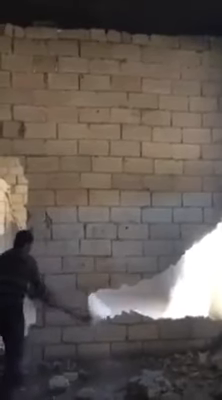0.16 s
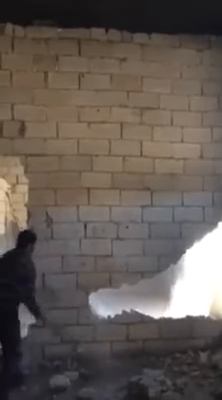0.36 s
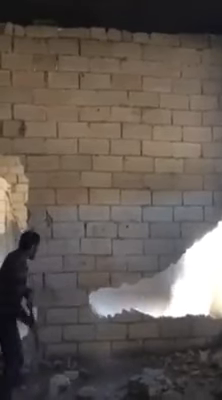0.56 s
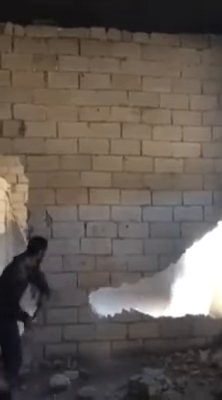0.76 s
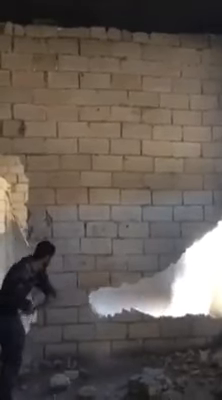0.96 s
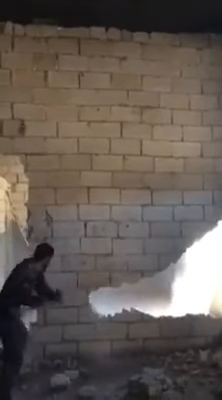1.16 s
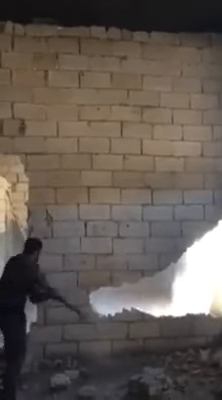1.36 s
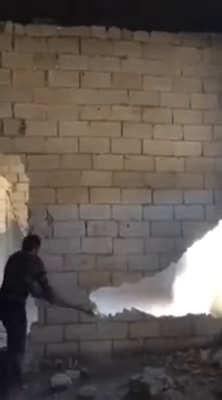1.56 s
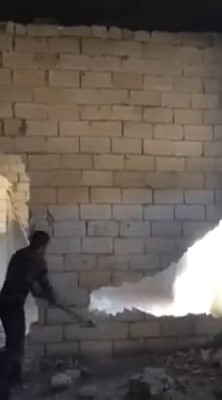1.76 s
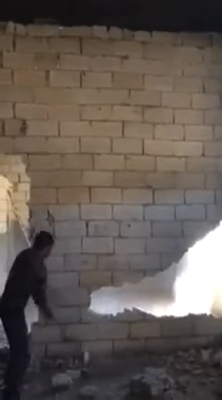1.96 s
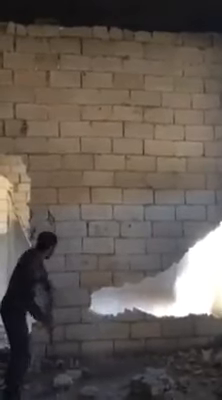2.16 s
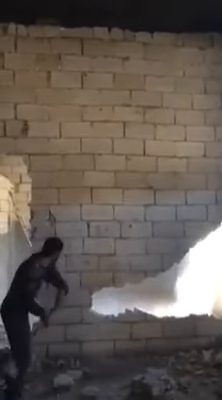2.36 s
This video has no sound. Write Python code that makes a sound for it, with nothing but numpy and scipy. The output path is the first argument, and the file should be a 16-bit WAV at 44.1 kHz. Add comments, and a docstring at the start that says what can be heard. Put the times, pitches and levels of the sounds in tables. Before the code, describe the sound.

A sledgehammer hits a concrete-block wall at 0.24 s with a deep, heavy thud and short block knock, its boom and dull echoes decaying for over a second in a large bare shed. Grit patters near 0.6 s and rubble scuffs lightly until 1.6 s. At 1.78 s a second blow lands, less bassy, with a brighter steel clack, and grit falls again around 2.1 and 2.4 s. Faint low background throughout.

```python
"""Sledgehammer on a block wall

A sledgehammer strikes a concrete-block wall twice inside a large bare shed, over a faint background noise.
Each blow is a low thud of the wall, a knock of the block and a ring of the steel head, all from struck modes,
plus a noisy crack. The shed, a decaying noise response, rings on for well over a second; dull echoes follow.
Loosened grit, made of random grains, drops a third of a second later; rubble scuffs between the blows."""
import sys
import numpy as np
from scipy import signal
from scipy.io import wavfile

SR = 44100
rng = np.random.default_rng(int(sys.argv[2]) if len(sys.argv) > 2 else 0)


def generate_wav(sig):
    """Save sig (samples, or channels by samples) to the path in sys.argv[1] as 16-bit PCM at SR."""
    pcm = np.round(np.clip(np.atleast_2d(sig).T, -1, 1) * 32767).astype(np.int16)
    wavfile.write(sys.argv[1], SR, pcm)


N = 105840  # samples

# The hammer blows. Each row: time in seconds, thud level in dB, thud pitch in Hz, knock level in dB,
# crack level in dB, steel ring level in dB, then the bass, middle and treble sent into the shed, in dB.
BLOWS = [(0.2423, 2.5, 180, -2, -31, -29, 1, -9, -6.5),
         (1.7837, -5, 133, -10.5, -24.5, -4.5, -5, 1.5, -1.5)]
# Resonances of the whole wall. Each row: pitch in Hz, level in dB, t60 in seconds.
WALL_MODES = [(77, -11, 0.051), (123, 3, 0.11), (154.8, -0.5, 0.1)]


def amp(db):
    """Turns dB into an amplitude factor."""
    return 10 ** (np.asarray(db, float) / 20)


def rms_one(x):
    """Scales a signal to an RMS of one."""
    return x / np.sqrt(np.mean(x ** 2) + 1e-20)


def at_hz(points, hz):
    """Reads a curve of (Hz, value) points along a logarithmic frequency axis."""
    points_hz, values = np.array(points).T
    return np.interp(np.log(hz), np.log(points_hz), values)


def clicks(times, levels_db):
    """Single-sample clicks, each shared between its two nearest samples."""
    out = np.zeros(N + 2)
    at = np.asarray(times) * SR
    first, fraction = at.astype(int), at % 1
    np.add.at(out, first, amp(levels_db) * (1 - fraction))
    np.add.at(out, first + 1, amp(levels_db) * fraction)
    return out[:N] + 1e-18  # tiny offset keeps the filters off denormals


def ring(x, modes):
    """Clicks strike a bank of resonators, each a decaying sine (Hz, dB, t60 s)."""
    out = 0
    for hz, db, t60 in modes:
        radius = amp(-60 / (t60 * SR))  # decay per sample
        w = 2 * np.pi * hz / SR
        feedback = [1, -2 * radius * np.cos(w), radius * radius]
        out = out + signal.lfilter([0, amp(db) * np.sin(w)], feedback, x)
    return out


def band(x, low_hz, high_hz):
    """Band-pass filter."""
    sos = signal.butter(2, [low_hz, min(high_hz, .45 * SR)], "band", fs=SR, output="sos")
    return signal.sosfilt(sos, x)


def bands():
    """Third-octave bands of noise, as (centre Hz, noise)."""
    edges = 22 * 2 ** (np.arange(30) / 3)
    white = rng.standard_normal((2, N + SR // 2))  # neighbouring bands take different noise
    out = []
    for k, (low, high) in enumerate(zip(edges, edges[1:])):
        noise = band(white[k % 2], low, high)[-N:]  # drops the filter's start-up
        out.append((np.sqrt(low * high), noise))
    return out


def swell(start, rise, t60):
    """Envelope that rises from start (rise in seconds), then dies away by 60 dB per t60."""
    t = np.maximum(np.arange(N) / SR - start, 0)
    return (1 - np.exp(-t / max(rise, 1e-4))) * amp(-60 * t / t60)


def grit():
    """Falling grit and scuffed rubble: dense uneven grains, each patch with its own colour."""
    # Patches. Each row: start in seconds, level in dB, rise in seconds, t60 in seconds,
    # centre in Hz, width in octaves.
    patches = [(-.05, -57.5, 0.013, 0.55, 2000, 3.0), (0.089, -54, 0.017, 0.37, 5500, 0.89),
               (0.1545, -48.5, .001, 0.22, 4440, 1.57), (0.156, -54.5, 0.0093, 0.33, 1330, 3),
               (.54, -53, 0.014, 1.26, 6740, 0.77), (0.597, -43.5, 0.005, 0.28, 5560, 0.9),
               (.78, -49, 0.075, 0.6, 5200, 0.97), (0.961, -46.5, 0.041, 0.41, 2800, 1.84),
               (1.413, -55, 0.0064, 0.45, 1760, 1.22), (1.42, -53.5, 0.01, 0.24, 3770, 0.61),
               (1.43, -62.5, 0.0073, 1.1, 5700, 0.96), (1.575, -59, 0.0083, 4.5, 3800, 2.06),
               (2.125, -50, 0.017, 0.93, 8950, 3.2), (2.364, -39, 0.033, 0.46, 4460, 1.3)]
    grains_per_s, spread_db = 4000, 1.5
    out = 0
    for start, db, rise, t60, hz, octaves in patches:
        present = rng.random(N) < grains_per_s / SR
        size = amp(spread_db * np.minimum(rng.exponential(1, N), 4))
        grains = present * size * rng.choice([-1, 1], N)
        half_width = 2 ** (octaves / 2)
        coloured = rms_one(band(grains, hz / half_width, hz * half_width))
        out = out + amp(db) * swell(start, rise, t60) * coloured
    return out


def air():
    """Steady background: noise bands weighted into one smooth spectrum."""
    # Spectrum of the background. Each row: frequency in Hz, relative density in dB per Hz.
    spectrum = [(25, -24), (70, 3.5), (140, -1), (300, -8.5), (800, -11), (2200, -15.5), (4000, -20),
                (8000, -33), (15000, -35)]
    level_db = -55.5  # RMS of the whole
    coloured = sum(amp(at_hz(spectrum, hz)) * noise for hz, noise in bands())
    return amp(level_db) * rms_one(coloured)


def wall_thud():
    """The wall yields slowly: one low, soft mode per blow, after a faint low lead-in and a push through the ground."""
    lead_s, t60_s, soft_hz = 0.0019, 0.051, 496
    ground_lead_s, ground_db, ground_hz = 0.00542, -9.5, 282  # dB relative to the thud
    lead_in_s, lead_in_db = 0.0158, -36                       # dB relative to the thud
    s, thud_db, thud_hz, *_ = np.transpose(BLOWS)
    lead_in = ring(clicks(s - lead_in_s, thud_db + lead_in_db), WALL_MODES)
    ground = ring(clicks(s - ground_lead_s, thud_db + ground_db), [(ground_hz, 0, .02)])
    thud = lead_in + ground
    for t, db, hz in zip(s, thud_db, thud_hz):
        thud = thud - ring(clicks([t - lead_s], [db]), [(hz, 0, t60_s)])  # opposite push
    return signal.sosfilt(signal.butter(2, soft_hz, fs=SR, output="sos"), thud)


def knock_and_steel():
    """Block face and hammer head ring as struck modes, touched twice as the head rebounds."""
    # Block face modes, the knock. Each row: pitch in Hz, level in dB, t60 in seconds.
    block_modes = [(960, -6.5, 0.016), (1230, 4.5, 0.0073), (1830, 7, 0.0051)]
    # Hammer head modes. Each row: pitch in Hz, level in dB, t60 in seconds.
    steel_modes = [(2160, 2.5, 0.012), (3080, 7.5, 0.0073), (4000, -4, 0.019)]
    rebound_s, rebound_db = 0.0064, -11  # second touch, relative to the first
    s, _, _, knock_db, _, steel_db, *_ = np.transpose(BLOWS)
    touches = np.r_[s, s + rebound_s]
    knock = ring(clicks(touches, np.r_[knock_db, knock_db + rebound_db]), block_modes)
    steel = ring(clicks(touches, np.r_[steel_db, steel_db + rebound_db]), steel_modes)
    return -knock - steel


def crack():
    """Splitting concrete: a sharp burst of bright noise with a little full-range noise under it."""
    rise_s, t60_s, low_hz, high_hz = 0.00065, 0.087, 2500, 7400
    s, _, _, _, crack_db, *_ = np.transpose(BLOWS)
    bright = band(rng.standard_normal(N), low_hz, high_hz)
    noise = rms_one(bright + amp(-11) * rng.standard_normal(N))
    burst = sum(amp(db) * swell(t, rise_s, t60_s) for t, db in zip(s, crack_db))
    return burst * noise


def shed_pulses():
    """What each blow sends into the shed: one three-band pulse, its top stronger for a clean steel contact."""
    middle_from_hz, treble_from_hz = 1040, 5600
    s, *_, bass_db, middle_db, treble_db = np.transpose(BLOWS)
    bass, middle, treble = clicks(s, bass_db), clicks(s, middle_db), clicks(s, treble_db)

    def under(hz, x):
        return signal.lfilter(*signal.butter(1, hz, fs=SR), x)

    return under(middle_from_hz, bass - middle) + under(treble_from_hz, middle - treble) + treble


def shed(x):
    """Dense reflections of the bare shed: convolution with noise that dies band by band."""
    # Ring time of the shed. Each row: frequency in Hz, t60 in seconds.
    ring_times = [(40, 2.5), (90, 2.0), (130, 2), (200, 1.56), (300, 1.7546), (480, 1.91), (800, 1.5237),
                  (1940, 1.56), (4000, 1.32), (5500, 1.08), (9000, 0.0949), (14000, 0.13)]
    # Tone of the shed. Each row: frequency in Hz, relative level in dB.
    colour = [(25, -20), (50, 2.5), (85, 8.5), (125, 12), (170, 6), (250, 6), (340, 3.5), (480, 2),
              (800, -3), (1400, -8), (2200, -8), (3300, -10), (5000, -17.5), (8000, -19.5), (14000, -27)]
    shed_db = -4
    build_s, bass_build_cycles = 0.0039, 2.16  # the bass takes some cycles to build
    early_db, early_t60_s = -3.5, 0.18         # near walls add a short first part
    lumpy_db, lump_top_hz = 1, 59              # reflections arrive in clumps
    answer = 0
    for hz, noise in bands():
        build = build_s + bass_build_cycles / hz
        late = swell(0, build, at_hz(ring_times, hz))
        early = amp(early_db) * swell(0, build, early_t60_s)
        answer = answer + amp(at_hz(colour, hz)) * noise * (late + early)
    lumps = rms_one(band(rng.standard_normal(N), lump_top_hz / 3, lump_top_hz))
    answer = answer * amp(lumpy_db * lumps)
    return amp(shed_db) * signal.fftconvolve(x, answer)[:N]


def echoes():
    """Dull returns of the thud from far walls: wall modes struck again, kept to the low band."""
    # Returns. Each row: time in seconds, level in dB.
    returns = [(0.327, -10), (0.354, -13.5), (.405, -14), (0.511, -23), (0.811, -30), (1.239, -40.5),
               (1.359, -42), (1.891, -14.5), (2.054, -19.5)]
    s, db = np.transpose(returns)
    return band(ring(clicks(s, db), WALL_MODES), 60, 290)


def scene():
    """Blows, echoes and grit, heard directly and through the shed, over the background."""
    bits = grit()
    background = air()
    hammer = wall_thud() + knock_and_steel() + crack()
    reverb = shed(shed_pulses() + amp(-15) * bits)  # grit feeds the shed gently
    return (hammer + echoes() + bits + reverb + background)[None]


def record(dry):
    """Rounds the tallest peaks towards a ceiling, then cuts the top of the spectrum."""
    ceiling, cutoff_hz = .92, 15500
    rounded = dry / (1 + (dry / ceiling) ** 4) ** .25
    return signal.sosfilt(signal.cheby2(12, 60, cutoff_hz, fs=SR, output="sos"), rounded)


dry = scene()
out = record(dry)
generate_wav(out)
```